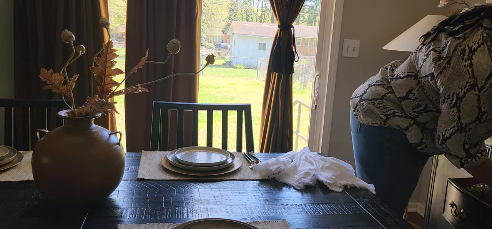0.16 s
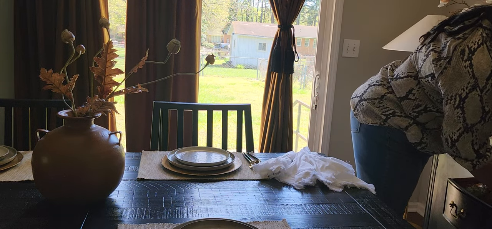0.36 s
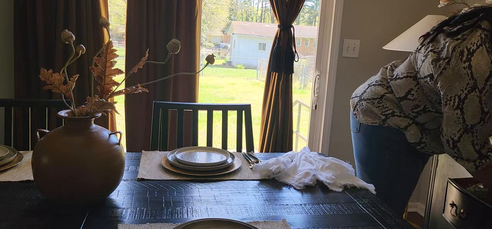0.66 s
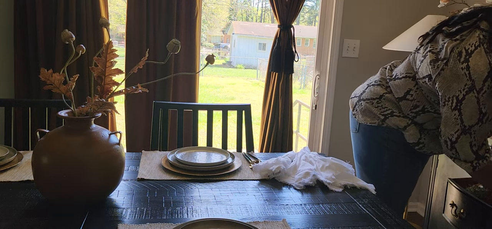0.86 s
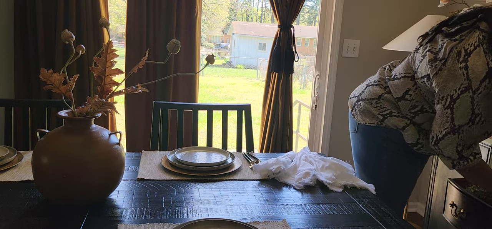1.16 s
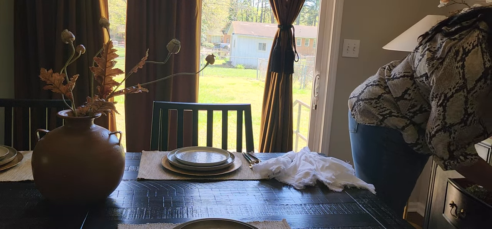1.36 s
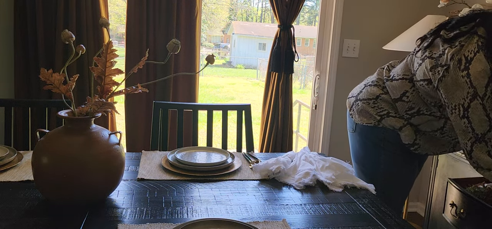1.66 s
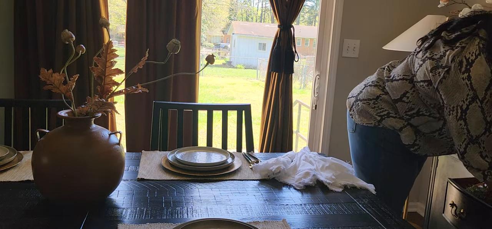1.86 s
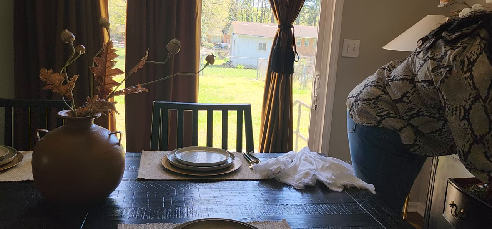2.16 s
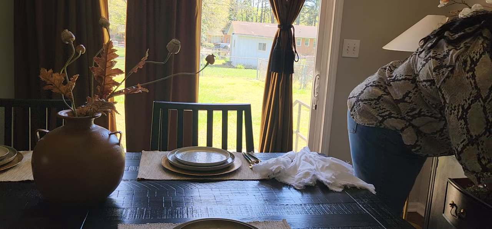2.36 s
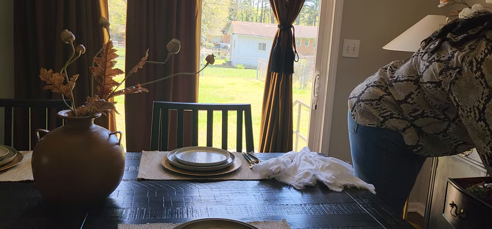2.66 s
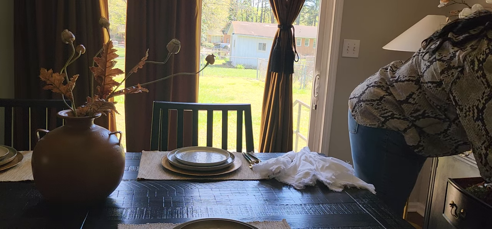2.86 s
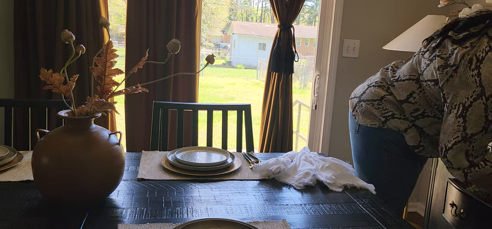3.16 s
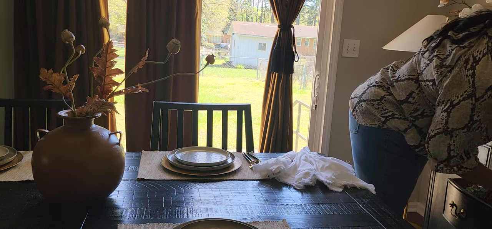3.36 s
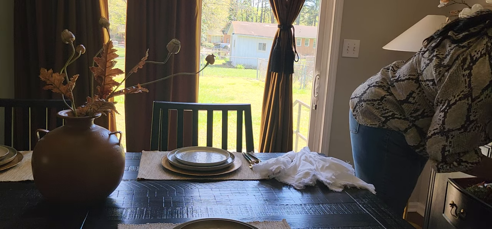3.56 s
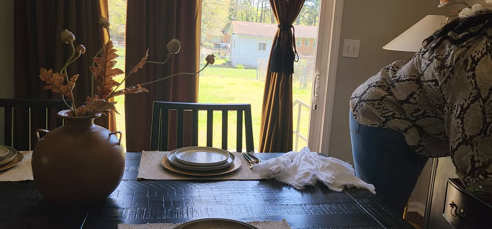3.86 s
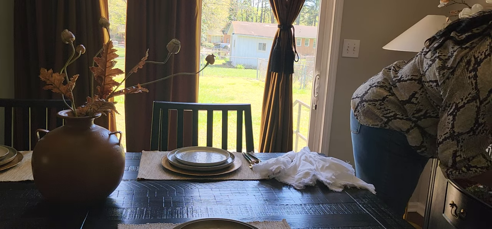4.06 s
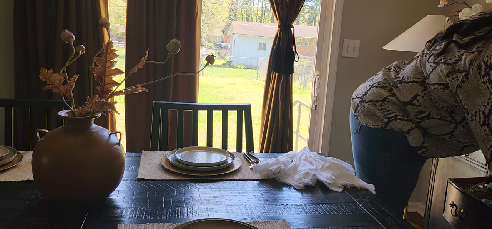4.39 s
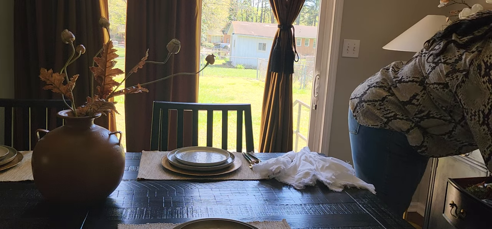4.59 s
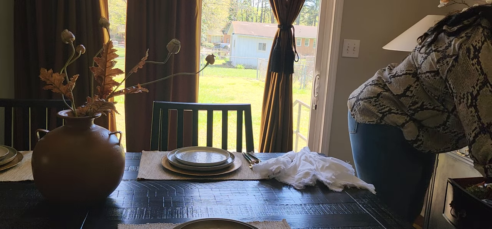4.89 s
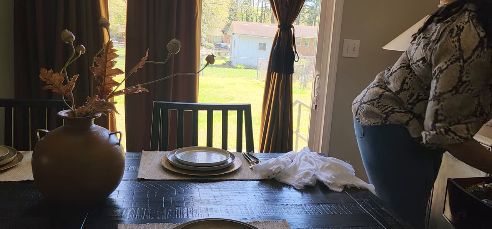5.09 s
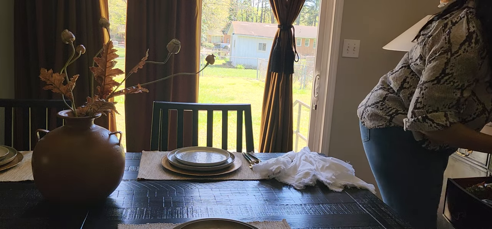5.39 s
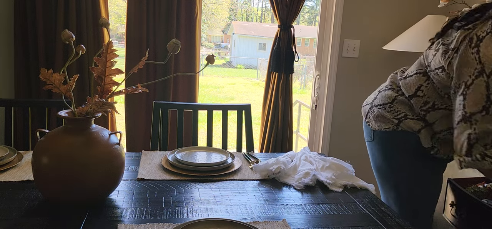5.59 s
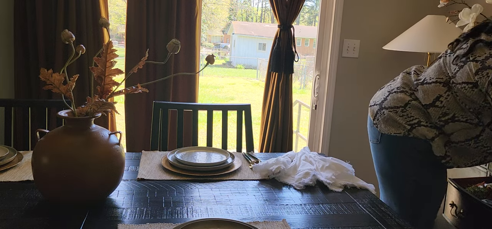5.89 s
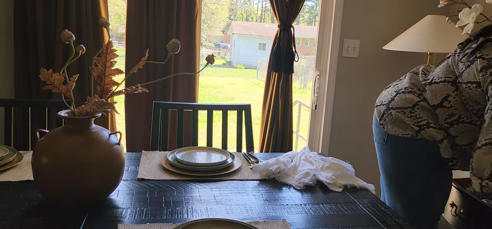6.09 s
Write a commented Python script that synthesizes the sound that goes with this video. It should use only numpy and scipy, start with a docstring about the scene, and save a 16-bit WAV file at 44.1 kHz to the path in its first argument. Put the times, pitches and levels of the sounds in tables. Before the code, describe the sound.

In a quiet dining room with a faint low rumble, someone picks through forks in a wooden drawer, heard from a couple of metres away. Isolated metal clinks give way to a busier stretch of rattling, knocking and short scrapes. The sharpest knock comes after that, then softer wooden bumps and low thuds from the cabinet. Clothing rustles faintly, and each impact has a short room echo.

```python
"""Sorting forks in a drawer

Forks are sorted in a wooden sideboard drawer, a couple of metres to the right in a quiet dining room.
Impacts set the forks clinking and the wood knocking in their own modes; stick-slip friction makes
the sliding metal scrape. A sleeve rustles, the cabinet booms softly and weight shifts on the floor.
The room rings for about half a second after every knock and clink."""
import sys
import numpy as np
from scipy import signal
from scipy.fft import rfft, irfft
from scipy.io import wavfile

SR = 44100
rng = np.random.default_rng(int(sys.argv[2]) if len(sys.argv) > 2 else 0)


def output_pcm(signal):
    """Save a mono or channel-first signal as 16-bit PCM at the path in sys.argv[1].

    Samples are clipped to [-1, 1] before scaling.
    """
    pcm = np.clip(np.atleast_2d(signal).T, -1, 1) * 32767
    wavfile.write(sys.argv[1], SR, np.round(pcm).astype(np.int16))


N = 275184
T = np.arange(N) / SR
RING = 24576  # samples allowed for one decay
RING_T = np.arange(RING) / SR

# Blows on the drawer. Each row: start in seconds, relative level in dB, contact time in ms,
# thud of the bottom panel in dB.
KNOCKS = [(0.301, -57, 0.36, -15.5), (0.476, -39.5, 0.35, -8), (1.173, -50, 1.7, 0), (1.209, -48.5, 2, -2),
          (1.606, -37, 0.31, -9.5), (1.655, -41.5, 0.49, -1.5), (1.95, -70.5, 1.7, 9),
          (2.59, -66.5, 0.51, 1.5), (2.741, -55, .5, -11), (2.803, -34.5, 0.88, -17),
          (2.838, -32, 0.6, -15.5), (2.947, -40, 0.52, -30), (3.213, -34, 0.57, 0),
          (3.247, -36.5, 0.21, -9), (3.554, -41, 1.76, -25), (4.35, -41, 0.47, -3.5),
          (4.405, -35, 0.91, -3.5), (4.537, -22, .32, -13), (4.774, -55.5, 0.33, -5),
          (4.893, -40.5, 1.33, -3), (4.903, -39.5, 0.79, 1), (5.078, -50.5, 1.7, 4),
          (5.215, -47, 0.87, 3.5), (5.336, -54, 0.69, 12), (5.538, -52.5, 0.86, 2),
          (5.577, -46, 2.25, -2.5), (5.753, -48, 2.15, 3.5), (5.884, -43.5, 1, -6),
          (5.893, -34.5, 1.34, -17.5), (5.93, -48, 0.48, -24)]
# Spectrum of a knock, from thud to tick. Each row: frequency in Hz, gain in dB.
KNOCK_COLOUR = [(50, -4), (125, -5), (280, 3.5), (520, 0), (780, -3.5), (1250, -6), (2300, -8),
                (6300, -8.5), (10500, -20.5)]
# Modes of the drawer panels. Each row: frequency in Hz, energy in dB, 60 dB decay time in seconds.
PANEL_MODES = [(125.6, -2, 0.24), (220.7, -3, 0.25), (285.9, -4.5, 0.2), (455.5, -2.5, 0.11),
               (645.7, -2.5, 0.12), (690, -3, 0.13), (789, -9.5, 0.21), (1268, -5.5, 0.055),
               (1650, -8, 0.074), (2024, -8, 0.056), (3190, -53.5, 0.11), (5980, 6, 0.033)]

# Modes of five forks. Each row: frequency in Hz, energy in dB, 60 dB decay time in seconds.
BRIGHT_FORK = [(3607, -13.5, 0.28), (3914, -10.5, .08), (5250, -9.5, 0.053), (6230, -8, 0.043),
               (6810, 3, .18), (7138, 1, 0.13), (7800, -3.5, .1), (8780, -5, .17), (9170, -4, .11),
               (10900, -2, .1), (10920, 0.5, .18), (11800, 0.5, .17), (11460, 3, 0.17), (12230, -1, 0.16),
               (12560, -2.5, .1), (13500, -3, 0.19), (14060, -7, 0.23), (14400, -9.5, .13),
               (15230, -11, .19), (15100, -6.5, .1)]
HEAVY_FORK = [(1293, -12, 0.076), (1620, -0.5, 0.047), (1670, 0.5, 0.08), (1785, -12.5, 0.1),
              (2530, -14.5, 0.34), (3120, -8.5, 0.021), (3720, -6, 0.069), (4250, -5.5, 0.094),
              (5720, -3, 0.1), (7300, -9.5, 0.22), (7180, 0.5, 0.017), (7390, -0.5, 0.035),
              (8520, -10.5, 0.07), (10060, 4, 0.16), (11320, -9.5, 0.17), (11500, -11, .08),
              (12280, -8, .14), (14100, -10, .15)]
LOOSE_FORK = [(1428, 4.5, 0.99), (1703, 1, 0.21), (3500, -14, .35), (4340, 0.5, 0.26), (6340, -18, .18),
              (6960, -2, .2), (11340, -20, .13)]
PINNED_FORK = [(1576, -2, 0.15), (2038, 1.5, 0.13), (2190, 0.5, 0.051), (3030, -34, .2), (5430, -4, 0.19),
               (5960, -7, 0.076), (6200, -7, 0.036), (9400, -23, .1), (12280, -17, .1), (13450, -32, .1)]
SMALL_FORK = [(2560, 2, 0.35), (3914, -3, 0.15), (5400, -12, .3), (6998, -5, 0.29), (7530, -6, 0.14),
              (11440, -11, 0.18)]
FORKS = [BRIGHT_FORK, HEAVY_FORK, LOOSE_FORK, PINNED_FORK, SMALL_FORK]
# Metal striking metal. Each row: start in seconds, fork index, relative level in dB,
# brightness in dB per octave, jostling of other forks in dB.
CLINKS = [(0.259, 0, -55, -6.5, 2.5), (0.298, 0, -31.5, 2.5, 5), (0.304, 0, -28.5, 20, -2),
          (0.313, 0, -41.5, -12, 4), (0.476, 3, -42.5, -12, 8), (1.136, 2, -63, 5, -14),
          (1.185, 2, -59.5, 4, -8), (1.225, 2, -61, -23, -21), (1.604, 1, -36, 8.5, -13),
          (1.611, 1, -30, -7.5, -4), (2.663, 0, -68.5, 2, 9), (2.838, 3, -44, -20, 6),
          (3.249, 3, -30.5, -1, 2.5), (3.38, 0, -57, 10, 11), (3.52, 2, -63, -1, -4),
          (3.654, 0, -62.5, -14.5, 9), (4.034, 1, -50, -15, -2), (4.35, 3, -45, -18, 9),
          (4.502, 1, -37.5, -0.5, -5), (4.776, 4, -55.5, 0, -1)]

# Cutlery pushed over the drawer bottom. Each row: start in seconds, length in seconds, relative level
# in dB, bite in dB (low when flat on wood, high when tines scrape on metal).
SLIDES = [(.81, 0.076, -75, -9), (1.135, .09, -67, -9.5), (2.585, .09, -71, -18), (2.73, 0.06, -56, -16.5),
          (2.79, 0.042, -50, -8.5), (2.862, 0.082, -55, -10), (2.923, 0.08, -45.5, 4.5),
          (2.99, .08, -49.5, 6), (3.185, 0.039, -47, 12), (3.275, .04, -51.5, -6),
          (3.305, 0.052, -44.5, -5.5), (3.375, 0.041, -41.5, 1), (3.42, .07, -54.5, -12.5),
          (3.509, .11, -67, -13), (3.735, .08, -50.5, -12.5), (3.765, 0.01, -46.5, 8.5),
          (3.853, 0.044, -46.5, 9), (3.91, 0.074, -55.5, 9), (3.959, 0.073, -50, 8.5),
          (4.024, 0.065, -56, -6.5), (4.27, 0.032, -71, -13)]
# Spectra of sliding on wood and metal. Each row: frequency in Hz, relative spectral density in dB.
RUMBLE_COLOUR = [(60, -24), (200, 11.5), (450, -4.5), (800, 7), (1400, -2), (3000, -26)]
SCRAPE_COLOUR = [(700, 0.5), (1600, 2), (2400, 1), (4000, -1), (7000, -1.5), (9000, -12.5), (12000, -15)]
HISS_COLOUR = [(5000, -46), (9000, -10), (12000, -14.5), (15500, -19)]

# Swings of the arm. Each row: fastest moment in seconds, length in seconds, level in dB.
ARM_SWINGS = [(.12, .12, -70), (0.257, 0.084, -66.5), (0.82, 0.15, -76.5), (1.565, 0.24, -66),
              (2.01, 0.11, -72.5), (2.294, 0.035, -73), (2.624, .15, -71.5), (4.407, .25, -72),
              (5.162, 0.25, -62.5), (5.398, 0.2, -64.5), (5.677, 0.31, -68.5), (6.205, 0.32, -71)]
# Spectra of light and firm cloth strokes. Each row: frequency in Hz, relative spectral density in dB.
SWISH_COLOUR = [(300, -17.5), (1500, -1), (4000, -5.5), (7500, 3), (9000, -8.5), (15000, -13.5)]
RUB_COLOUR = [(200, -17), (700, -5), (1400, 4.5), (2800, -4), (5000, -10.5), (12000, -8.5)]

# Jolts of the cabinet. Each row: start in seconds, relative level in dB, brightness in dB per octave.
JOLTS = [(2.831, -69.5, 31.5), (3.215, -37.5, -6), (4.407, -43.5, 2.5), (5.36, -58.5, 12.5),
         (5.888, -44.5, -16)]
# Weight shifting on the floor. Each row: start in seconds, relative level in dB.
WEIGHT_SHIFTS = [(3.564, -50.5), (3.647, -45.5), (5.349, -43.5)]
# Low modes of cabinet and floor. Each row: frequency in Hz, amplitude in dB, 60 dB decay time in seconds.
CABINET_MODES = [(116.4, 0.5, .19), (227, -19.5, 0.36), (247, -13, .8)]
FLOOR_MODES = [(38.4, -8, 0.52), (47.8, -11.5, 1), (64.3, 1, 0.21)]

# Reverberation of the walls. Each row: band centre in Hz, 60 dB decay time in seconds.
ROOM_T60 = [(100, 0.48), (300, 0.36), (700, 0.42), (2000, 0.41), (4000, 0.32), (7500, 0.32), (14000, 0.026)]
# Spectrum of the still room. Each row: frequency in Hz, relative spectral density in dB.
ROOM_TONE_COLOUR = [(20, -8), (40, 0), (57, 5), (78, -6), (115, -8), (170, -19.5), (400, -25.5),
                    (1000, -32), (2500, -38.5), (7800, -36), (9500, -46.5), (15500, -39.5)]
# Response of the microphone. Each row: frequency in Hz, gain in dB.
MIC_COLOUR = [(8500, 1), (9350, -3), (9750, -10.5), (10300, -7.5), (10900, -1.5), (12000, -2.5)]
# Imbalance of its two ports. Each row: frequency in Hz, left gain minus right gain in dB.
PORT_BALANCE = [(100, 2), (220, 4.5), (900, 4.1), (2400, 3), (4400, -0.5), (8000, -0.5), (13000, 6)]


def knocks(gain_db=45, soft_db_per_octave=12, thud_hz=390, panel_db=-13):
    """Impact on wood: a contact cracks and rings the panels, but barely drives periods shorter than it."""
    out = np.zeros((2, N))
    hz, base_db = np.transpose(KNOCK_COLOUR)
    bass_share = 1 / (1 + (hz / thud_hz) ** 6)
    for start, level_db, contact_ms, thud_db in KNOCKS:
        octaves_above = np.log2(1 + (hz * contact_ms / 1000) ** 4) / 4  # above 1 / contact time
        spectrum_db = base_db - soft_db_per_octave * octaves_above + thud_db * bass_share
        # every spot of the drawer favours other modes
        modes = [(mode_hz * (1 + 0.012 * rng.standard_normal()), db + 2 * rng.standard_normal(), t60)
                 for mode_hz, db, t60 in PANEL_MODES]
        panels = undb(panel_db) * unit_energy(ring(modes))
        crack = contact(chatter_db=-4, t60=0.033)
        blow = colour(crack + panels, np.column_stack([hz, spectrum_db]))
        heard = room(blow, early_db=5.5, tail_db=9, right_db=2.5, early_t60=0.07)
        add(out, start, undb(level_db + gain_db) * heard)
    return out


def clinks(gain_db=28, click_db=-6, neighbour_db=-4, detune=0.012):
    """Modal vibration: a struck fork rings; those it jostles chatter and answer slightly out of tune."""
    out = np.zeros((2, N))
    for start, fork, level_db, tilt_db, jostle_db in CLINKS:
        modes = [(hz, db + tilt_db * np.log2(hz / 5000), t60) for hz, db, t60 in FORKS[fork]]
        neighbours = [(hz * (1 + detune * rng.standard_normal()), db + neighbour_db + jostle_db, t60 / 2)
                      for hz, db, t60 in modes]
        lowest_hz = modes[0][0]
        click_colour = [(250, -22), (lowest_hz / 2, -24)] + [(hz, db) for hz, db, _ in modes]
        click = colour(contact(chatter_db=13.5, t60=0.063), click_colour)
        clink = unit_energy(ring(modes + neighbours)) + undb(click_db + jostle_db) * unit_energy(click)
        heard = room(clink, early_db=7.5, tail_db=2, right_db=4.2)
        add(out, start, undb(level_db + gain_db) * heard)
    return out


def contact(chatter_db, t60):
    """Contact force: one sharp impulse is followed by a decaying chatter of tiny ones."""
    force = undb(chatter_db) * unit_energy(rng.standard_normal(RING) * fade(t60))
    force[0] += 1
    return unit_energy(force)


def ring(modes):
    """Superposition: free vibration is a sum of damped sinusoids, here each with a random phase."""
    out = 0
    for hz, db, t60 in modes:
        phase = 2 * np.pi * (hz * RING_T + rng.random())
        out += undb(db) * unit_energy(fade(t60) * np.sin(phase))
    return out


def slides(rumble_db=-4, scrape_db=-1, hiss_db=-17):
    """Sliding friction: the wood rumbles, the metal scrapes and hisses; bite trades rumble for hiss."""
    slips = stick_slip(spread_db=3.8)
    layers = [wood_rumble(slips), tine_scrape(slips), colour(slips, HISS_COLOUR)]
    envelopes = np.zeros((len(layers), N))
    for start, length_s, level_db, bite_db in SLIDES:
        mix_db = np.array([rumble_db - 0.84 * bite_db, scrape_db, hiss_db + 1.2 * bite_db])
        add(envelopes, start, np.outer(undb(level_db + mix_db), push_force(length_s)))
    return sum(unit(layer) * envelope for layer, envelope in zip(layers, envelopes))


def stick_slip(spread_db, grains_per_s=500):
    """Stick-slip motion: surfaces catch and let go in dense noise grains of very unequal size."""
    sizes = undb(spread_db * np.minimum(rng.exponential(size=N), 5))
    envelope = np.repeat(sizes, SR // grains_per_s)[:N]
    return unit(rng.standard_normal(N) * envelope)


def wood_rumble(slips, panel_db=-9):
    """Forced vibration: the drawer panels ring along with what rubs on them."""
    rumble = colour(slips, RUMBLE_COLOUR)
    panels = signal.fftconvolve(rumble, unit_energy(ring(PANEL_MODES)))[:N]
    return rumble + undb(panel_db) * panels


def tine_scrape(slips, singing_db=-6):
    """Resonance: the broadband scratch of the tines sets the modes of the dragged forks singing."""
    scratch = colour(slips, SCRAPE_COLOUR)
    singing = signal.fftconvolve(scratch, ring(HEAVY_FORK + PINNED_FORK))[:N]
    return unit(scratch) + undb(singing_db) * unit(singing)


def push_force(length_s, attack_s=0.018, sag_db_per_s=17.5, release_s=0.013):
    """Force envelope: a push catches, weakens as it goes and dies away."""
    attack = np.minimum(RING_T / attack_s, 1)
    release = np.exp(-np.maximum(RING_T - length_s, 0) / release_s)
    return attack * undb(-sag_db_per_s * RING_T) * release


def sleeve(rest_db=-82, firm_db=-65, rub_growth=1.7):
    """Cloth friction: the swish follows arm speed; a coarser rub grows faster and leads in firm strokes."""
    swings = sum(undb(db) * np.exp(-(2 * (T - peak_s) / length_s) ** 2)
                 for peak_s, length_s, db in ARM_SWINGS)
    stroke_db = 20 * np.log10(np.hypot(swings, undb(rest_db)))  # cloth still stirs between swings
    rub_db = firm_db + rub_growth * (stroke_db - firm_db)
    swish = unit(colour(stick_slip(spread_db=2), SWISH_COLOUR)) * undb(stroke_db)
    rub = unit(colour(stick_slip(spread_db=4), RUB_COLOUR)) * undb(rub_db)
    return swish + rub


def thumps():
    """Structure-borne sound: the cabinet booms when jolted, the floor under shifting weight."""
    out = np.zeros(N)
    for start, level_db, tilt_db in JOLTS:
        add(out, start, undb(level_db) * boom(CABINET_MODES, tilt_db))
    for start, level_db in WEIGHT_SHIFTS:
        add(out, start, undb(level_db) * boom(FLOOR_MODES))
    return out


def boom(modes, tilt_db=0, rise_s=0.0051):
    """Transient response: a heavy body swells, then decays in its low modes."""
    lowest_hz = modes[0][0]
    swing = np.zeros(RING)
    for hz, db, t60 in modes:
        amplitude = undb(db + tilt_db * np.log2(hz / lowest_hz))
        swing += amplitude * np.sin(2 * np.pi * hz * RING_T) * fade(t60)
    return 2 * swing * (1 - np.exp(-RING_T / rise_s))


def room(source, early_db, tail_db, right_db, early_t60=0.081, gap_s=0.002, left_lag_s=0.00026):
    """Reflection: direct sound reaches the right port first, close furniture answers, the walls linger."""
    tail = wall_reverberation()
    scatter = rng.standard_normal((2, RING)) * rng.exponential(size=RING)
    early = port_pair(*scatter) * fade(early_t60)
    response = undb(early_db) * unit_energy(early) + undb(tail_db) * unit_energy(tail)
    response *= RING_T > gap_s
    response[0, round(left_lag_s * SR)] += 1  # direct sound
    response[1, 0] += 1
    heard = signal.fftconvolve(source[None], response, axes=1)[:, :len(source)]
    # each port receives the energy of the source, the nearer one a little more
    balance = undb([[-right_db / 2], [right_db / 2]])
    return np.array([unit(port) for port in heard]) * np.std(source) * balance


def wall_reverberation():
    """Diffuse field: dense reflections merge into noise, each band decaying at its own rate."""
    spectrum = rfft(port_pair(*rng.standard_normal((2, RING))))
    bins_hz = np.fft.rfftfreq(RING, 1 / SR)
    tail = np.zeros((2, RING))
    for centre_hz, t60 in ROOM_T60:
        band = curve_at([(hz, hz == centre_hz) for hz, _ in ROOM_T60], bins_hz)
        tail += irfft(spectrum * band) * fade(t60)
    return tail


def room_tone(level_db=-61.5):
    """Ambient noise: the house rumbles under a faint, even hiss."""
    air = [colour(rng.standard_normal(N), ROOM_TONE_COLOUR) for _ in range(2)]
    return undb(level_db) * unit(port_pair(*air))


def port_pair(mid, difference, shared_hz=700):
    """Spatial coherence: two close microphone ports hear the same bass but unrelated treble."""
    side = signal.sosfilt(signal.butter(1, shared_hz, "high", fs=SR, output="sos"), difference)
    return np.array([mid + side, mid - side])


def colour(x, points, size=4096):
    """Minimum-phase filtering: folding the cepstrum makes a (Hz, dB) response causal."""
    gain = undb(curve_at(points, np.fft.rfftfreq(size, 1 / SR)))
    cepstrum = irfft(np.log(gain))
    cepstrum[1:size // 2] *= 2
    cepstrum[size // 2 + 1:] = 0
    response = irfft(np.exp(rfft(cepstrum)))
    return signal.fftconvolve(x, response)[:len(x)]


def curve_at(points, hz):
    """Interpolation of (Hz, value) points on a log-frequency axis."""
    points_hz, values = np.transpose(points)
    return np.interp(np.log(np.maximum(hz, 1)), np.log(points_hz), values)


def fade(t60):
    """Exponential damping: the level falls 60 dB in t60 seconds."""
    return np.exp(np.maximum(-np.log(1000) * RING_T / t60, -20))


def undb(db):
    """Amplitude ratio of a level in decibels."""
    return 10 ** (np.asarray(db) / 20)


def unit(x):
    """Normalisation to rms 1."""
    return x / np.sqrt(np.mean(x ** 2))


def unit_energy(x):
    """Normalisation to energy 1."""
    return x / np.sqrt(np.sum(x ** 2))


def add(track, start_s, sound):
    """Superposition of a sound on a track from a given time."""
    i = max(int(start_s * SR), 0)
    track[..., i:i + sound.shape[-1]] += sound[..., :N - i]


def scene():
    """Sound pressures add: knocks, clinks, rubbing and thumps lie over the still room."""
    rubbing = room(slides() + sleeve(), early_db=5.5, tail_db=0, right_db=2.5)
    return knocks() + clinks() + rubbing + thumps() + room_tone()


def record(dry, top_hz=15750):
    """Microphone response: a notch near 10 kHz, two ports of unequal colour and a steep treble cut."""
    ports = []
    for channel, sign in zip(dry, (1, -1)):
        port_colour = [(hz, sign * db / 2) for hz, db in PORT_BALANCE]
        ports.append(colour(colour(channel, MIC_COLOUR), port_colour))
    low_pass = signal.ellip(10, 0.2, 70, top_hz, fs=SR, output="sos")
    return signal.sosfilt(low_pass, np.array(ports))


dry = scene()
out = record(dry)
output_pcm(out)
```